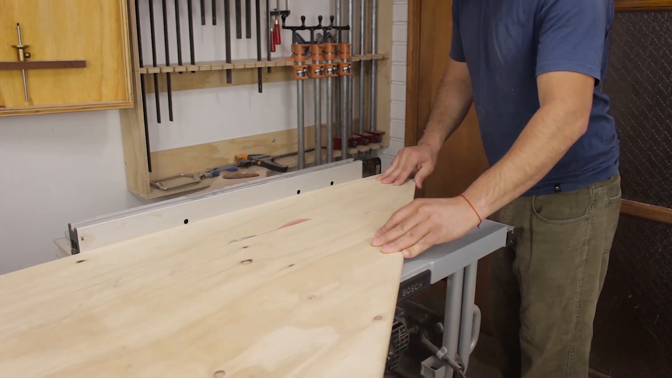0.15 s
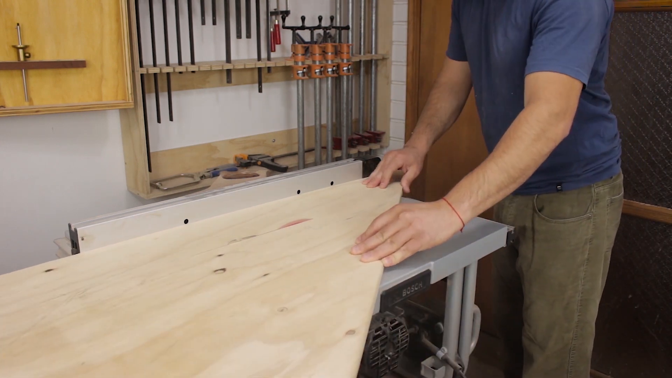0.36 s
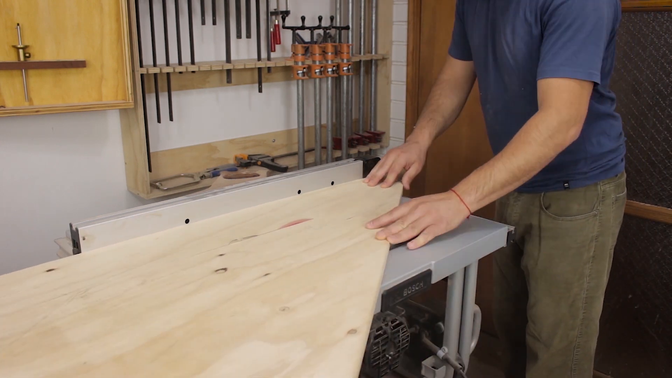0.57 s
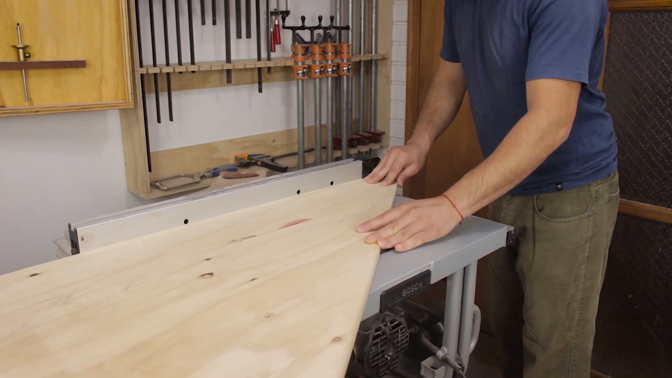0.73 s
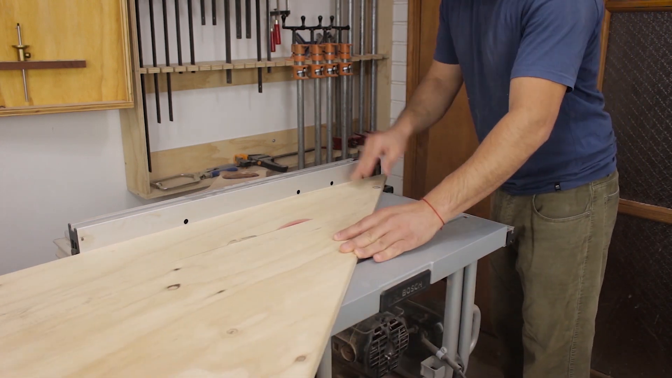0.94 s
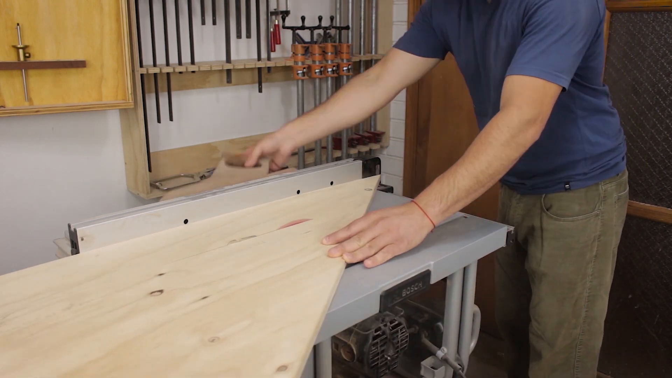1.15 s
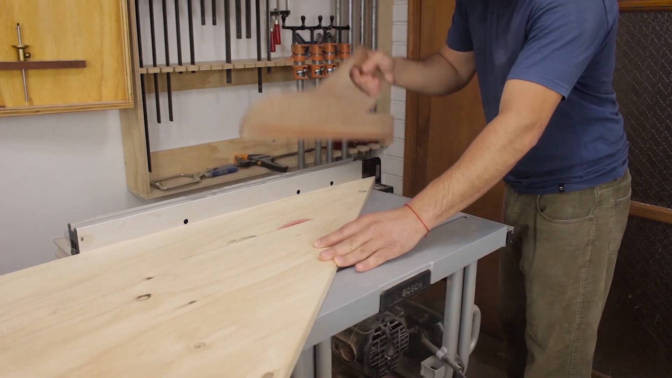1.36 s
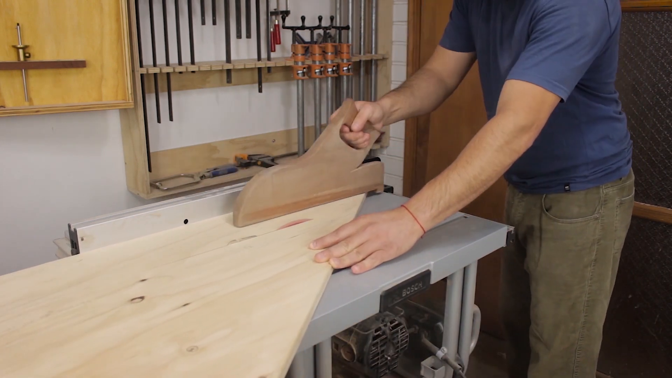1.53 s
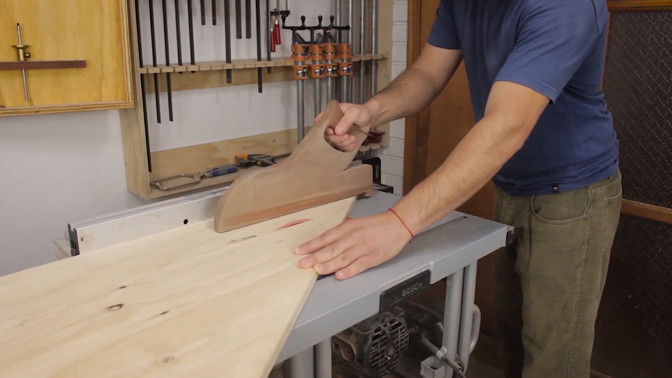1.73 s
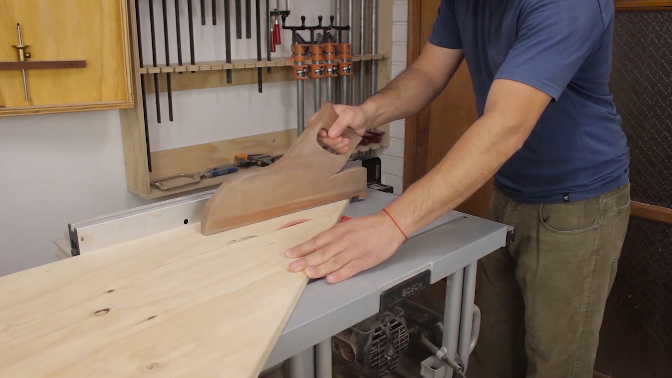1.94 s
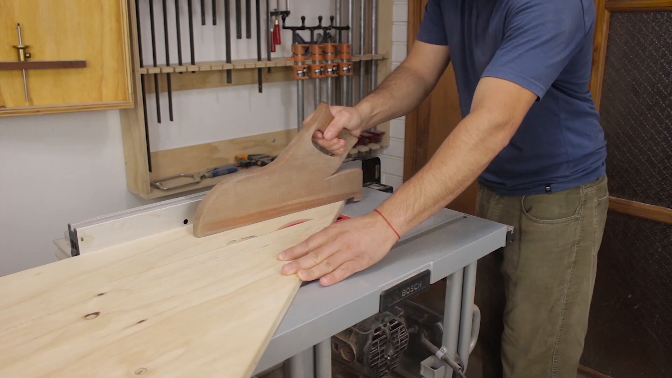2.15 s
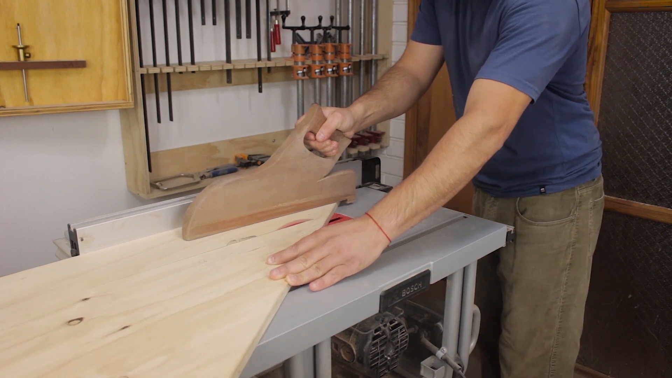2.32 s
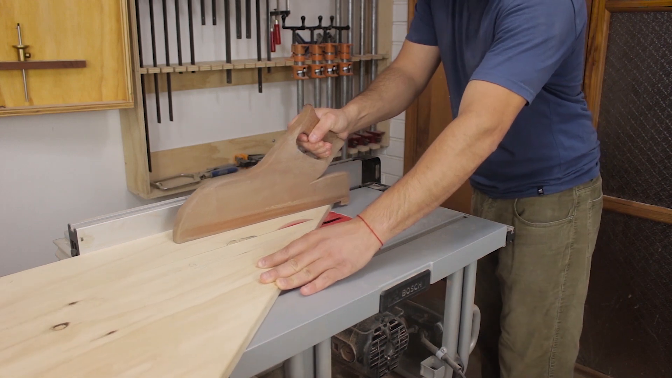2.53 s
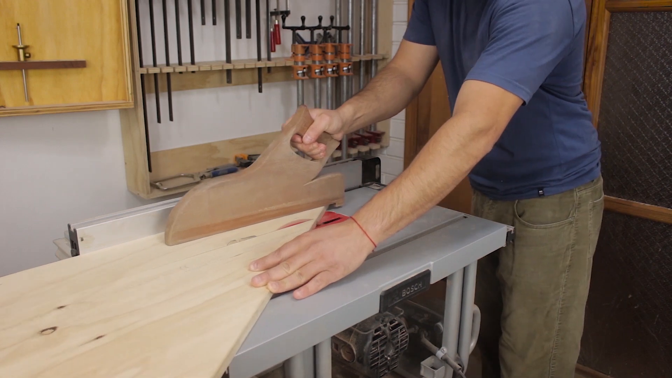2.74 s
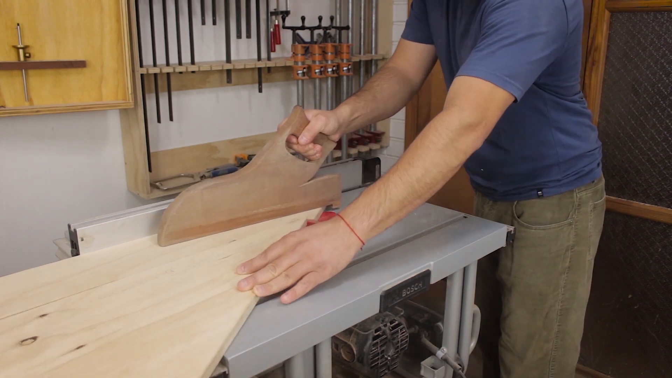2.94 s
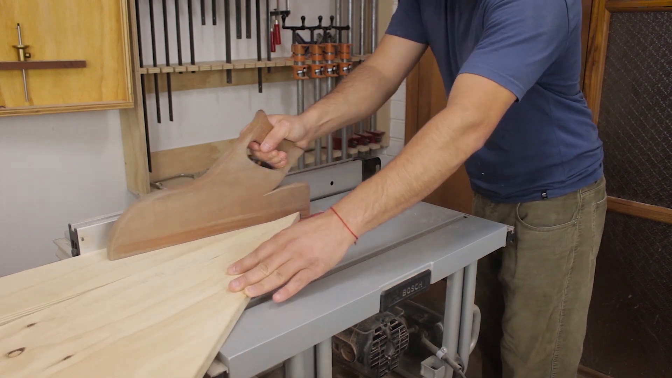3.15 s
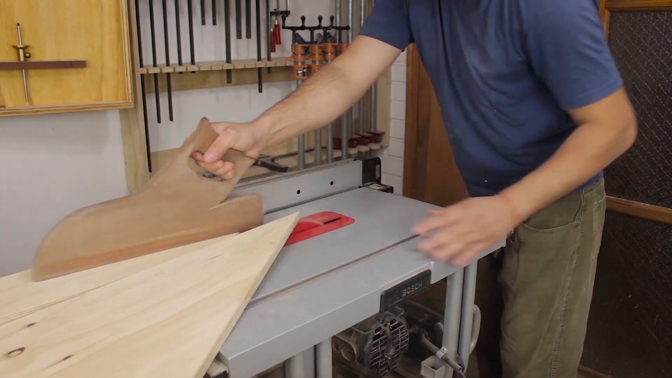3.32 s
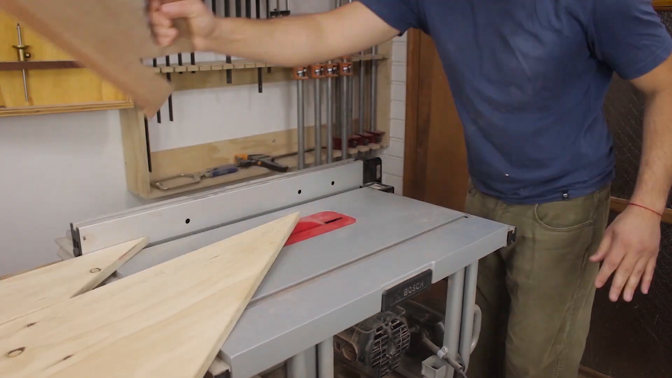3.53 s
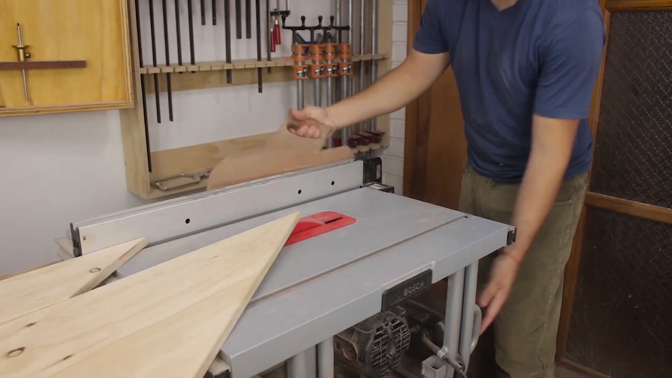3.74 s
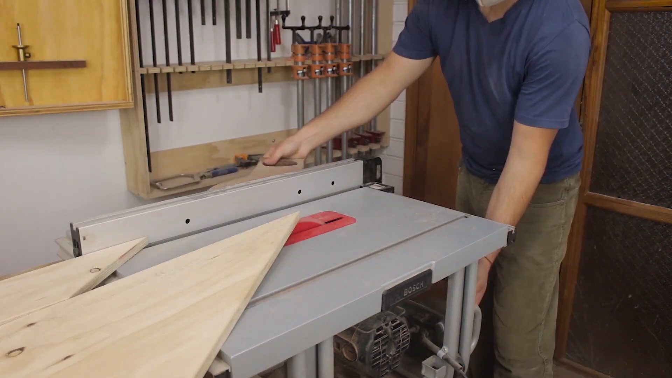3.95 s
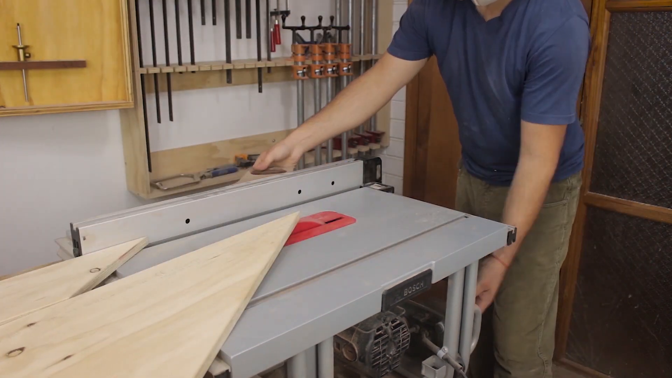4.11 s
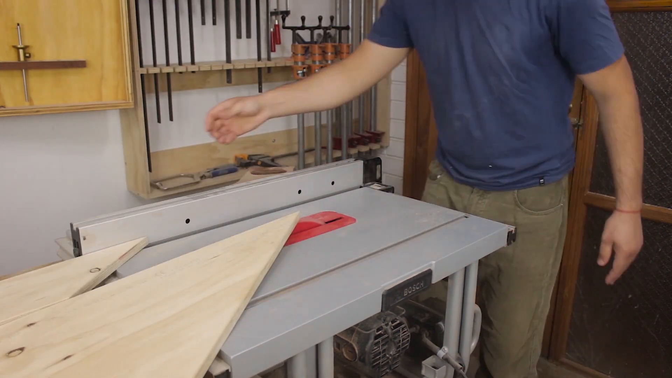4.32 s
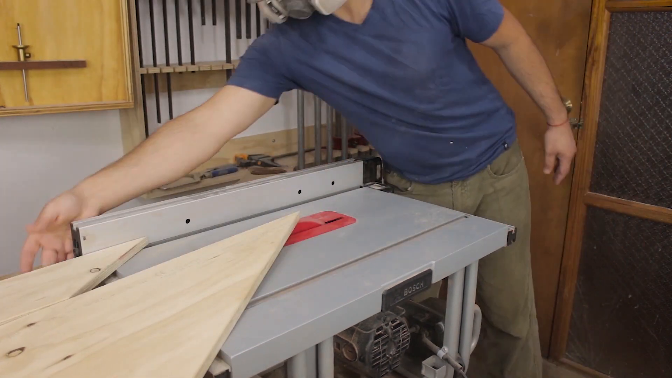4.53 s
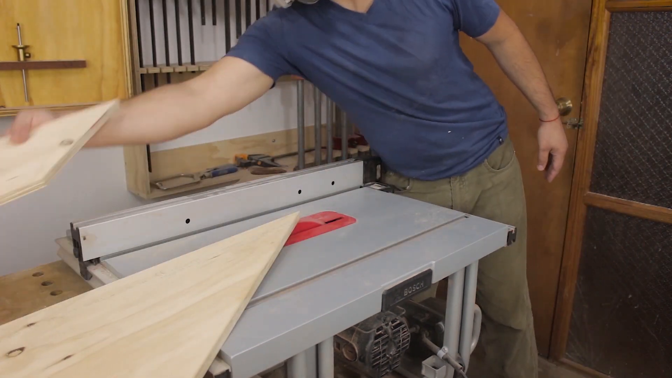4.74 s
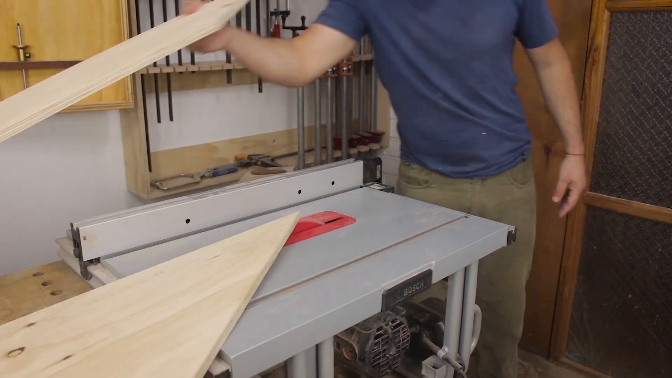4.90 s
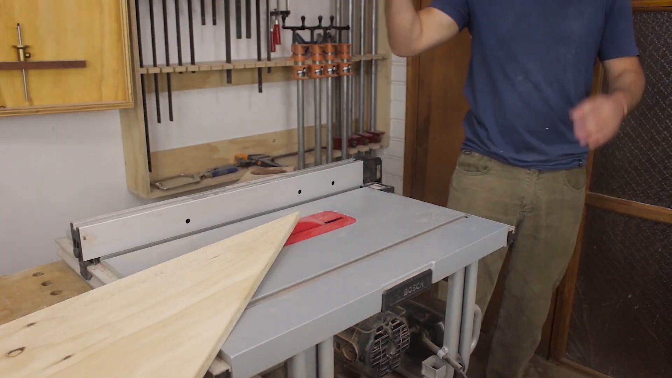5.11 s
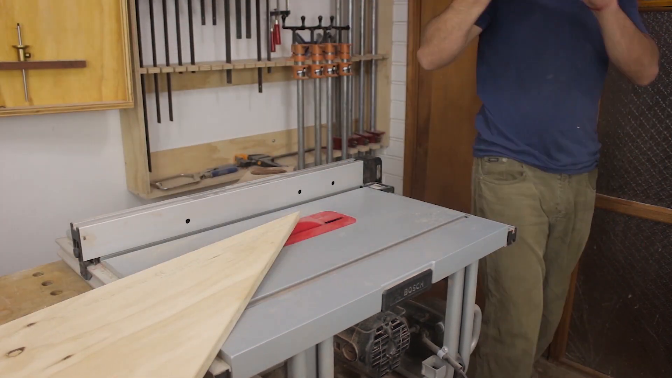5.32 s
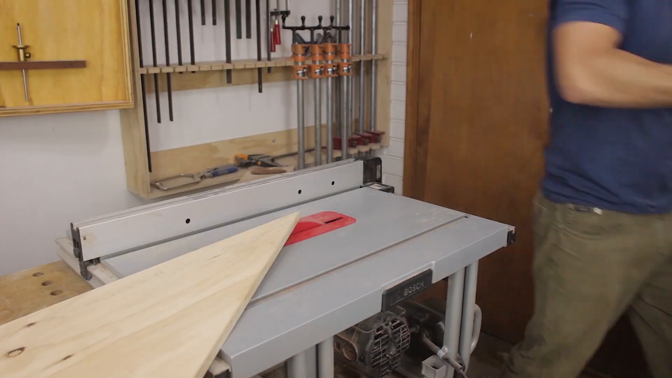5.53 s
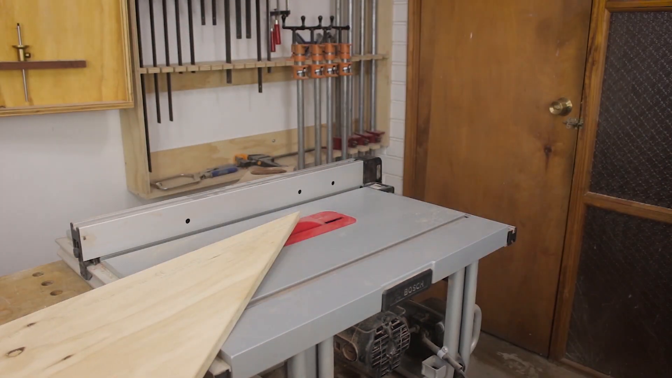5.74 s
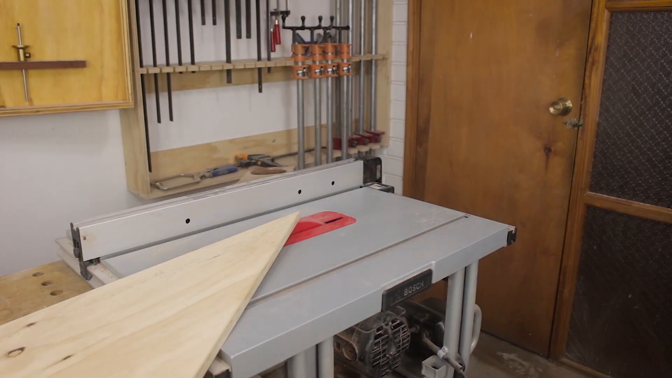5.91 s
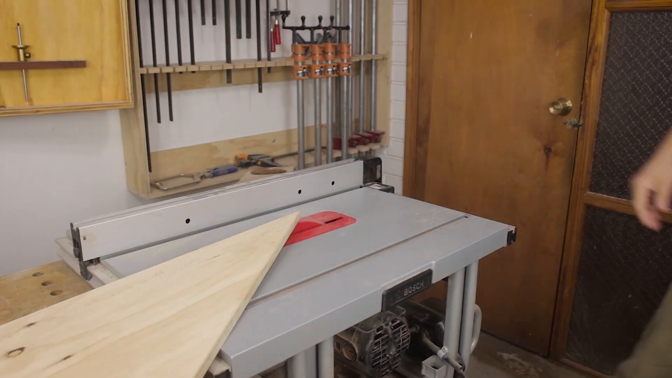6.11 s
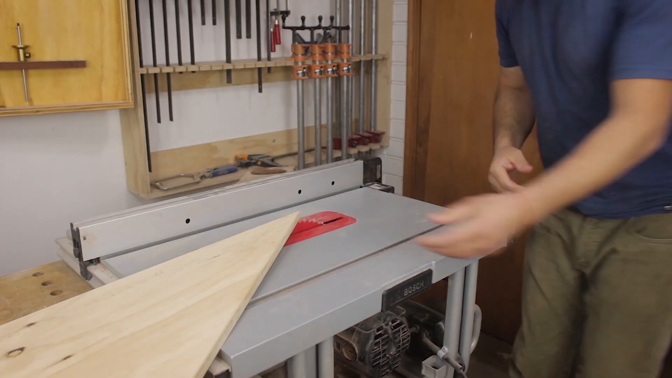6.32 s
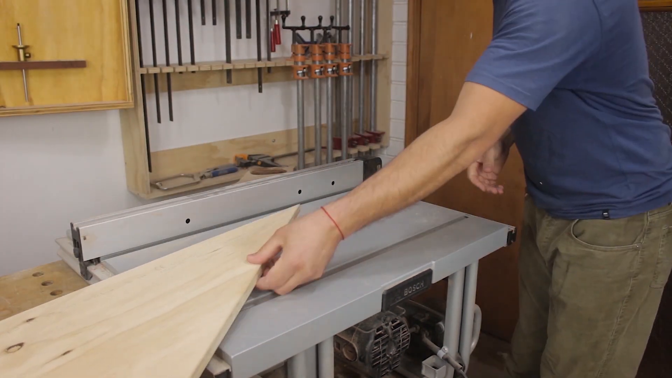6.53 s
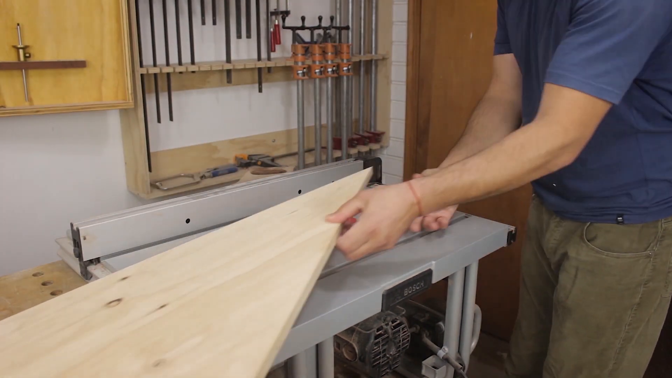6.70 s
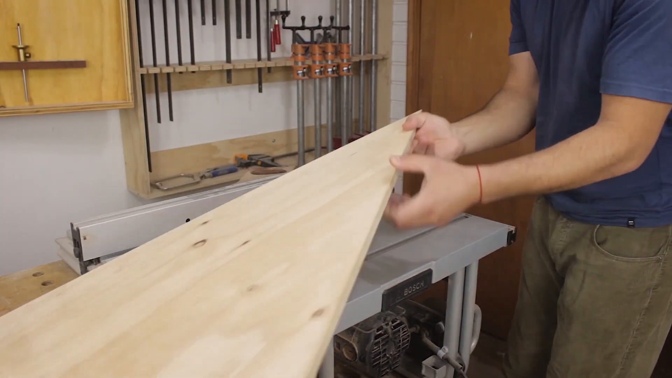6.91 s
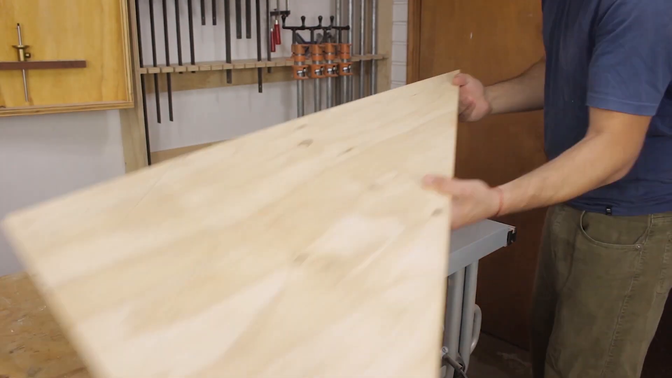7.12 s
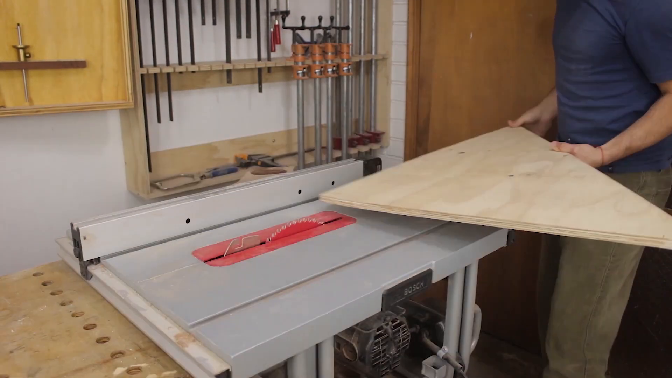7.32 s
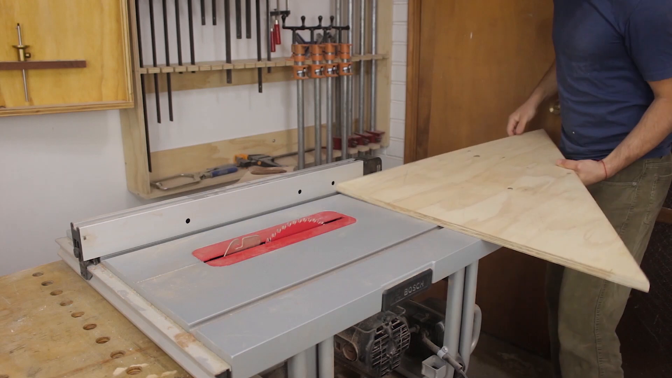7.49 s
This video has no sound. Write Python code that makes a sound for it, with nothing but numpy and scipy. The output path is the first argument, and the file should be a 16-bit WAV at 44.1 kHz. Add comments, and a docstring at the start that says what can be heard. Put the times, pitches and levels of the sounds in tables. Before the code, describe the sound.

In a small hard-walled workshop, one nearby microphone catches a geared electric saw under load, its high buzzing tone sagging and recovering above tearing wood. Hard wooden clacks mark the end of the cut. The motor spins cleaner and higher, then loses power, its whine and brush hiss sinking gradually. As it fades, a sheet scrapes briefly across the table and lands with a dry woody tap.

```python
"""A table saw with a geared brush motor finishes a cut through plywood in a small hard workshop; one microphone.
Gear rattle rings the housing and the blade; main shaft tones, fan air and chips sound directly; boards knock.
The cut ends and the saw runs free; switched off, it coasts down with brush hiss and broad noise, then a whine.
At rest, a sheet is dragged off the table as grainy rubbing that wakes the wood, among the last knocks.
Shaft speed steers the machine: phase sums make its tones, shaped noises its air and chips, decaying modes its knocks."""
import sys
import numpy as np
from scipy import signal
from scipy.fft import rfft, irfft
from scipy.io import wavfile
from scipy.ndimage import uniform_filter1d

SR = 44100
rng = np.random.default_rng(int(sys.argv[2]) if len(sys.argv) > 2 else 0)


def boost(x):
    """Linear amplitude factor 10**(x/20) for a level x in decibels (scalar or array-like)."""
    u = np.asarray(x, float) / 20
    return 10 ** u


def wrap_up_sound(samples):
    """Save the sound to the file named by the first command line argument, as 16-bit audio."""
    columns = np.atleast_2d(samples).T
    # keep every value between -1 and 1, then stretch to whole-number steps
    tamed = np.clip(columns, -1, 1)
    steps = np.round(tamed * 32767).astype(np.int16)
    wavfile.write(sys.argv[1], SR, steps)


N = 333396
T = np.arange(N) / SR

# motor shaft under load, then running free: t/s, f/Hz
SHAFT_SPEED = [(0.0, 966), (.12, 930), (.24, 902), (.37, 897), (.49, 928), (.62, 993), (.74, 1021),
               (.87, 962), (.99, 921), (1.25, 954), (1.5, 983), (1.62, 993), (1.75, 963), (1.87, 952),
               (2.0, 949), (2.12, 978), (2.25, 969), (2.37, 949), (2.5, 949), (2.62, 953), (2.87, 1000),
               (3.25, 1044), (3.62, 1064), (4.13, 1070)]
CUT_END_S, SWITCH_OFF_S = 3.3, 4.13
FREE_HZ = 1070
# a full cut sags the shaft this far, and late by this much
FULL_SAG_HZ, LAG_S = 126, 0.15
# coasting: Hz lost per s = friction + drag * Hz ** 2, down to a lowest value
FRICTION_HZ_PER_S, FAN_DRAG_PER_TURN, REST_HZ = 396, 3.24e-4, 42

# per turn of the motor shaft: blade teeth passing, commutator bars, gear teeth
TEETH_PER_TURN, BARS, GEAR_TEETH = 10.53, 12, 10
# how the machine answers by speed: shaft f/Hz, unbalance level/dB, third shaft tone level/dB, commutator level/dB
SPEED_ANSWER = [(120, -97, -100, -100), (216, -81, -58.5, -67), (300, -67, -84, -72),
                (430, -67.5, -76, -84.5), (616, -61, -75, -55), (700, -51, -73, -43), (770, -40, -48, -42),
                (840, -38.5, -39.5, -46.5), (940, -42.5, -40.5, -43.5), (938, -40.5, -38.5, -40),
                (951, -43, -35.5, -41), (965.5, -47, -44, -38.5), (996, -51, -49.5, -40),
                (1070, -70, -53.5, -42.5), (1062, -75, -55.5, -61.5), (1072, -61, -60.5, -27)]
COAST_TONE_DB = 2.5  # the unbalance tone is freer once the power is off
# further shaft tones, as multiples of the shaft rate
TONE_MULTIPLES = [2, 4, 5, 5.27, 7, 9, 10, 11, 13, 14, 15, 16, 17, 18, 20, 27, 30, 32]
# their levels, a column per multiple, a row each for cutting, free, coasting: level/dB over the housing noise
TONE_LEVELS = [
    [-17, -26, -30, -27, -26, -17, -8, -11, -26, -32, -28, -30, -36, -36, -36, -36, -36, -36],
    [-22, -30, -34, -40, -32, -30, -17, -20, -12, -32, -36, -36, -36, -36, -36, -36, -36, -36],
    [-19, -24, -34, -40, -26, -25, -20, -21, -17, -20, -17, -11, -17, -18, -19, -16, -17, -16],
]
TOOTH_DB, TOOTH_DB_PER_LOAD = -9.5, 9  # tooth tone over the chips at full load

# air pushed by the fan: f/Hz, level/dB per Hz
FAN_AIR = [(1760, -30), (3000, -1.5), (4950, -7.5), (5570, -6), (10100, 1), (10500, 4), (12100, -0.5),
           (12400, 1.5), (13300, -12.5), (13600, -22), (15500, -14.5)]
FAN_DB, FAN_TOP_HZ, FAN_DB_PER_DECADE = -31, 1059, 70.5  # level at that shaft speed, and its slope
# broad noise of the housing: f/Hz, level/dB per Hz
HOUSING_NOISE = [(59, -73.5), (100, -33.5), (179, -36.5), (621, -13), (1110, -3), (1200, -6), (1270, -2.5),
                 (2230, -7.5), (3580, -7), (4480, -6), (9000, -7), (11700, -38.5), (19800, -120)]
HOUSING_DB, HOUSING_DB_PER_DECADE = -36.5, 24  # the slope acts while coasting
# panels rung by noise: f/Hz, width/Hz, level/dB over the housing noise
PANEL_MODES = [(1278, 22, -13), (1690, 60, -17), (560, 30, -30), (355, 16, -38)]
# housing and table resonances: f/Hz, width/Hz, gain/dB on the drive
BODY_MODES = [(1280, 45, 9), (1830, 50, 3), (2790, 90, 13), (3110, 55, 5), (5310, 90, 9), (5600, 160, 10),
              (6760, 120, 3), (9540, 70, 5), (10100, 200, 3), (11100, 130, 2)]
# rattle over the housing noise, and the meshing whine over the same
GEAR_DB, GEAR_DB_PER_LOAD, COAST_GEAR_DB, MESH_DB = -14, 4, -3.5, -10
# ringing blade: f/Hz, feed level/dB from the drive, t60/s
BLADE_MODES = [(2380, -59, .6), (5310, -64, .8), (5600, -65, 1.3), (5700, -65, .7)]
# below this speed housing and gears fall by dB * seconds ** power; the hiss falls faster by its factor
STALL_HZ, STALL_DB, STALL_POWER, HISS_STALL = 101, 599.5, 3.01, 2.1

# how hard the blade bites: t/s, chips level/dB
CUT_FEED = [(0, -30), (.1, -30), (.45, -32), (.7, -38.5), (.9, -32.5), (1.3, -33.5), (2.3, -28.5),
            (3.0, -30), (3.2, -34.5), (3.4, -43.5), (3.6, -100)]
# chips torn and thrown: f/Hz, level/dB per Hz
CHIP_NOISE = [(18, -60.5), (30, -38), (432, -33.5), (673, -9.5), (728, -18), (945, -12.5), (1020, -6.5),
              (2550, -5.5), (2830, 2), (3070, -3.5), (5450, -12.5), (9940, 1.5), (15500, -4.5)]
# blade resonances in the cut: f/Hz, width/Hz, level/dB over the chips
CUTTING_MODES = [(1200, 20, -24), (4970, 100, -23), (6020, 100, -25), (7690, 35, -21), (7860, 30, -13),
                 (8800, 120, -21), (12830, 30, -19), (13580, 35, -18), (13700, 25, -20)]

# blows of push block and boards: t/s, peak level/dB, pitch factor, brightness/dB per octave, clatter decay/s
KNOCK_EVENTS = [(0.177, -43, 0.92, -14, 0.024), (1.511, -22.5, 1.04, 0, 0.0054),
                (2.91, -38, 1.1, -4, 0.014), (2.943, -18.5, 0.98, 1.5, 0.015),
                (3.079, -16.5, 0.97, 1.5, 0.02), (3.515, -14, 1.26, 1.7, 0.03),
                (3.55, -14.5, 1.06, 3, 0.024), (3.578, -22.5, 0.96, 6, 0.018),
                (5.867, -36, 1.06, -1.5, 0.014), (5.988, -38, 1.09, 1, 0.04),
                (6.506, -63, 0.98, -1, 0.0077), (6.527, -60, 1.1, 0.5, 0.012),
                (6.552, -57.5, 1.13, -5.5, 0.009), (6.594, -62, 0.84, -1, .008),
                (7.008, -43, 0.91, 1, 0.013), (7.154, -52, 0.79, -3.5, 0.0055),
                (7.307, -56, 1.13, 3, 0.013), (7.462, -45, 0.96, -4, 0.0078),
                (7.539, -37.5, 0.93, 1.5, 0.0067), (7.547, -34, 0.75, -1, .005),
                (7.556, -24.5, 1.03, 1.5, .012)]
# modes of the plywood: f/Hz, level/dB, t60/s
WOOD_MODES = [(260, -17, .05), (390, -14, .07), (560, -7, .1), (750, -5, .08), (940, -4, .06),
              (1300, -1.5, .06), (1690, -4, .04), (2290, -5, .035), (2850, -3, .03), (3500, -6, .03),
              (4300, -8, .03), (5200, -7, .03), (6400, -9, .025)]

# soft narrow hums: start t/s, end t/s, f/Hz, width/Hz, level/dB
HUM_BANDS = [(.6, 2.9, 300, 14, -69.5), (3.2, 4.2, 174, 10, -74.5), (4.2, 5.8, 233, 20, -74)]

# brush hiss: f/Hz, level/dB per Hz
BRUSH_HISS = [(1760, -33), (3000, -27), (3490, 8), (4840, -30), (5710, -11), (7130, 4.5), (7750, -3),
              (8360, -15), (9400, 1.5), (11400, 7), (15700, -2)]
HISS_DB, HISS_DB_PER_DECADE = -41.5, 16

# a row a rub of the sheet or the dull tail of a knock:
# loudest t/s, lift-off t/s, level/dB, treble level/dB, rise/dB per s
RUBS_AND_TAILS = [(6.56, 6.565, -70.5, -22, 1500), (6.726, 7.002, -55, 0, 280),
                  (7.066, 7.067, -48, -7, 155), (7.165, 7.16, -76, -6, 1200), (7.327, 7.323, -72, -3, 500),
                  (7.249, 7.29, -83, 0, 200), (7.402, 7.44, -79, 10, 250), (7.466, 7.46, -57, -24, 2504)]
# plywood rubbing the table top: f/Hz, level/dB per Hz
RUB_NOISE = [(59, -68), (100, -33), (173, -13), (313, -24), (386, -1), (438, -26.5), (508, -8.5),
             (682, -12), (742, -3), (879, -5), (956, -8.5), (1880, -2.5), (10600, -17.5), (15500, -22)]
SAG_DB_PER_S, LIFT_DB_PER_S = 37, 360

ROOM_T60_S, ROOM_DB, ROOM_TOP_HZ = 0.25, -11.5, 4630
FLOOR_DB = -88
MIC_LOW_HZ, TOP_HZ = 198, 15750
CLIP = 0.14  # ceiling of the input, full scale = 1


def curves(table):
    """Columns of a table as signals in time."""
    times, *columns = np.transpose(table)
    return [np.interp(T, times, column) for column in columns]


def unit(x):
    """Scale to rms 1."""
    return x / np.sqrt(np.mean(x ** 2))


def colour(x, points):
    """Shape a noise by (Hz, dB) points; rms 1."""
    hz, db = np.transpose(points)
    f = np.maximum(np.arange(N // 2 + 1) * SR / N, 1)
    gain = boost(np.interp(np.log(f), np.log(hz), db))
    return unit(irfft(rfft(x) * gain, N))


def high(x, hz):
    """Second-order high-pass."""
    return signal.sosfilt(signal.butter(2, hz, "high", fs=SR, output="sos"), x)


def peak(x, hz, width):
    """Resonance with gain 1 at its centre."""
    return signal.lfilter(*signal.iirpeak(hz, hz / width, fs=SR), x)


def ring(x, hz, t60):
    """A struck mode: a sine decaying by 60 dB in t60 seconds."""
    radius, angle = 1000. ** (-1 / (t60 * SR)), 2 * np.pi * hz / SR
    return signal.lfilter([np.sin(angle)], [1, -2 * radius * np.cos(angle), radius * radius], x)


def walk(rate):
    """Random levels held 1 / rate s and slewed twice; spread 1."""
    steps = np.repeat(rng.standard_normal(int(N / SR * rate) + 2), 8)
    steps = uniform_filter1d(uniform_filter1d(steps, size=8), size=8)
    return np.interp(T * rate * 8, np.arange(len(steps)), unit(steps))


def noise(flicker_db, rate):
    """White noise whose level flutters."""
    return rng.standard_normal(N) * boost(flicker_db * walk(rate))


def during(start, end):
    """A gate in time with 0.1 s ramps."""
    return np.clip(np.minimum(T - start, end - T) / .1, 0, 1)


def room(x):
    """Dense decaying echoes, duller than the direct sound."""
    age = np.arange(SR // 2) / SR
    tail = rng.standard_normal(len(age)) * 1000. ** (-age / ROOM_T60_S) * (age > .004)
    tail = signal.lfilter(*signal.butter(1, ROOM_TOP_HZ, fs=SR), tail)
    return x + boost(ROOM_DB) * signal.fftconvolve(x, tail / np.linalg.norm(tail))[:N]


def shaft():
    """Shaft speed in Hz: set by the load, then braked by friction and by the fan."""
    scale = np.sqrt(FRICTION_HZ_PER_S / FAN_DRAG_PER_TURN)
    # the braking law integrates to a tangent
    angle = np.arctan(FREE_HZ / scale) - FRICTION_HZ_PER_S / scale * (T - SWITCH_OFF_S)
    coasting = scale * np.tan(np.clip(angle, 0, 1))
    hz = np.where(T < SWITCH_OFF_S, curves(SHAFT_SPEED)[0], coasting)
    return np.maximum(uniform_filter1d(hz, SR // 20, mode="nearest"), REST_HZ)


def cutting_load(hz, off):
    """Share of a full cut, read back from how the shaft sags and recovers."""
    sag = FREE_HZ - hz - LAG_S * SR * np.gradient(hz)
    return np.clip(sag / FULL_SAG_HZ, .01, 2) * ~off


def tone(turns, hz, multiple, db, flicker_db, rate):
    """A wavering shaft tone, muted where it would lie above about 16 kHz."""
    audible = multiple * hz < SR / 2.7
    level = np.sqrt(2) * boost(db + flicker_db * walk(rate))
    return level * audible * np.sin(2 * np.pi * multiple * turns)


def shaft_tones(turns, hz, off, load, chips_db):
    """Unbalance, third shaft tone and commutator follow speed; the tooth tone follows the bite."""
    speeds, *answers = np.transpose(SPEED_ANSWER)
    first_db, third_db, bar_db = (np.interp(hz, speeds, db) for db in answers)
    tooth_db = chips_db + TOOTH_DB + TOOTH_DB_PER_LOAD * (load - 1)
    out = tone(turns, hz, 1, first_db + COAST_TONE_DB * off, 2.5, 22)
    out = out + tone(turns, hz, 3, third_db, 2.5, 22)
    out = out + tone(turns, hz, BARS, bar_db, 2.5, 22)
    return out + tone(turns, hz, TEETH_PER_TURN, tooth_db, 2.5, 18)


def gears(turns, hz):
    """Teeth meet unevenly: smeared bands on the meshing rate, swelling once per turn of the big wheel."""
    mesh = 2 * np.pi * (GEAR_TEETH + .2) * turns
    bands = 0
    for k in range(1, 10):
        slip = np.cumsum((0.9 * hz + 70) / SR * (2.6 + .8 * k) * walk(800))
        audible = k * GEAR_TEETH * hz < SR / 2.7
        bands = bands + k ** -.05 * np.sin(k * mesh + slip) * audible
    swell = 1 + .5 * np.sin(2 * np.pi * turns / 6.3)
    return bands * swell * boost(2.5 * walk(40))


def gearbox(turns, hz, off, load):
    """Weak shaft tones and gear rattle under a cover, relative to the housing noise."""
    stage = (T > CUT_END_S) * 1 + off  # row: cutting, free, coasting
    weak = sum(tone(turns, hz, k, db[stage], 3.0, 11)
               for k, db in zip(TONE_MULTIPLES, np.transpose(TONE_LEVELS)))
    gear_db = np.where(off, COAST_GEAR_DB, GEAR_DB + GEAR_DB_PER_LOAD * load)
    # the small gearbox radiates little bass, and the cover dulls its treble
    box = high(weak, 1400) + boost(gear_db) * high(gears(turns, hz), 600)
    # the meshing turns into a clean whine as the shaft slows
    whine = tone(turns, hz, GEAR_TEETH, MESH_DB, 1.6, 13) * np.clip((430 - hz) / 150, 0, 1)
    box = box + high(whine, 700)
    box = signal.sosfilt(signal.butter(2, 14000, fs=SR, output="sos"), box)
    # once the power is off, some broad housing noise also drives the resonances
    return box + off * boost(-9) * colour(noise(2.5, 40), HOUSING_NOISE)


def housing():
    """Broad noise of the casing, plus panels resonating on noise of their own."""
    out = colour(noise(.9, 30), HOUSING_NOISE)
    return out + sum(boost(db) * unit(peak(noise(5.9, 5.84), f, w)) for f, w, db in PANEL_MODES)


def fan(hz):
    """Turbulent air, its level falling steeply with speed."""
    level_db = FAN_DB + FAN_DB_PER_DECADE * np.log10(hz / FAN_TOP_HZ)
    return boost(level_db) * colour(noise(0.34, 24.96), FAN_AIR)


def chips(chips_db):
    """Torn wood as coloured noise, with narrow resonances of the blade; level follows the bite."""
    out = colour(noise(1.1, 60), CHIP_NOISE)
    out = out + sum(boost(db) * unit(peak(noise(2.5, 12), f, w)) for f, w, db in CUTTING_MODES)
    return boost(chips_db) * out


def saw():
    """Gearbox and brush hiss through resonances, plus direct shaft tones, casing noise, hums, fan air and chips."""
    hz, off = shaft(), T > SWITCH_OFF_S
    turns = np.cumsum(hz * (1 + .0012 * walk(60))) / SR
    load, chips_db = cutting_load(hz, off), curves(CUT_FEED)[0]
    decades = np.log10(np.maximum(hz, STALL_HZ) / FREE_HZ) * off
    stall_s = np.maximum(T - T[np.argmax(hz < STALL_HZ)], 0)
    stall_db = -STALL_DB * stall_s ** STALL_POWER
    housing_db = HOUSING_DB + HOUSING_DB_PER_DECADE * decades + stall_db
    drive = boost(housing_db) * gearbox(turns, hz, off, load) + brush_hiss(decades, stall_db)
    drive = drive + sum(boost(db) * peak(drive, f, w) for f, w, db in BODY_MODES)
    blade = sum(boost(db) * ring(drive, f, t60) for f, db, t60 in BLADE_MODES)
    machine = shaft_tones(turns, hz, off, load, chips_db) + drive + blade
    casing = boost(housing_db + 0.5) * housing()
    return machine + casing + hums() + fan(hz) + chips(chips_db)


def faint_floor():
    """Steady broad noise under everything."""
    return boost(FLOOR_DB) * unit(peak(peak(rng.standard_normal(N), 2000, 7000), 2000, 9000))


def knocks():
    """Each blow is one sharp contact and a short scatter after it; it rings the wood with its own brightness."""
    out, n = np.zeros(N + SR), SR // 4
    age = np.arange(n) / SR
    for s, db, pitch, tilt_db, clatter in KNOCK_EVENTS:
        push = rng.standard_normal(n) * np.exp(-age / max(clatter, .001))
        push[0] += 3.0  # the contact
        blow = sum(boost(level + tilt_db * np.log2(f / 1000)) * ring(push, f * pitch, t60)
                   for f, level, t60 in WOOD_MODES)
        click = unit(peak(peak(push, 3100, 6000), 3200, 7600))
        blow = unit(blow) + boost(2 * tilt_db - 1.0) * click
        i = int(s * SR)
        out[i:i + n] += boost(db) * blow / np.abs(blow).max()
    return high(out[:N], 260)  # the knocks keep little bass


def hums():
    """Narrow bands of noise that fade in and out."""
    return sum(during(a, b) * boost(db) * unit(peak(rng.standard_normal(N), f, w))
               for a, b, f, w, db in HUM_BANDS)


def brush_hiss(decades, stall_db):
    """Hiss of the brushes after switch-off, sinking with speed and dying faster than the housing."""
    level_db = HISS_DB + HISS_DB_PER_DECADE * decades + HISS_STALL * stall_db
    return during(SWITCH_OFF_S, 8.4) * boost(level_db) * colour(noise(0.26, 30), BRUSH_HISS)


def drag():
    """Grainy rubbing of plywood on the table wakes the wood; each rub or knock tail swells, sags, lifts off."""
    rub = colour(noise(1.6, 58), RUB_NOISE)
    wood = unit(sum(boost(level) * ring(rub, f, t60) for f, level, t60 in WOOD_MODES))
    body = unit(unit(peak(rub, 1900, 3700)) + 0.5 * wood)
    treble = unit(high(rub, 3000))
    out = 0
    for s, end, db, treble_db, rise in RUBS_AND_TAILS:
        fall_db = np.maximum(rise * (s - T), SAG_DB_PER_S * (T - s))
        lift_db = LIFT_DB_PER_S * np.maximum(T - end, 0)
        out = out + boost(db - fall_db - lift_db) * (body + boost(treble_db) * treble)
    return out


def scene():
    """All sources in one room over a faint floor, the same in both channels."""
    return np.tile(room(saw() + knocks() + drag()) + faint_floor(), (2, 1))


def top_cut(x):
    """Nothing passes above the cut-off."""
    return signal.sosfilt(signal.butter(12, 16830, fs=SR, output="sos"), x)


def record(dry):
    """The microphone loses the bass; the input rounds the loudest peaks and cuts the top."""
    mix = high(dry, MIC_LOW_HZ)
    mix = mix / (1 + (mix / CLIP) ** 6) ** (1 / 6)
    mix = signal.sosfilt(signal.ellip(10, .2, 80, TOP_HZ, fs=SR, output="sos"), mix)
    return top_cut(mix)


dry = scene()
out = record(dry)
wrap_up_sound(out)
```